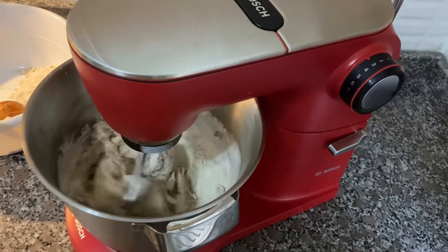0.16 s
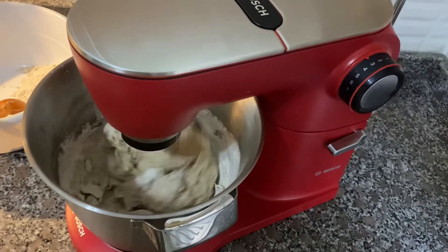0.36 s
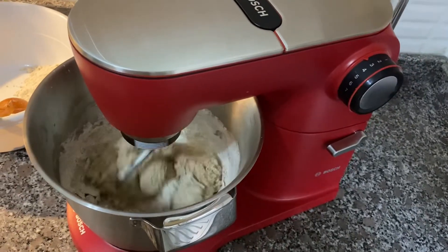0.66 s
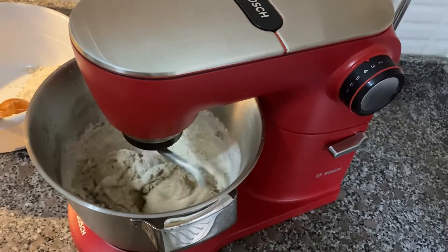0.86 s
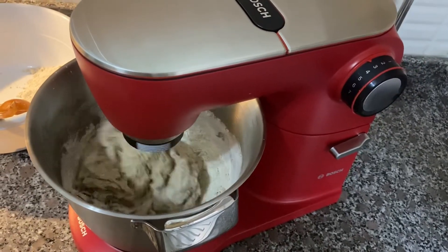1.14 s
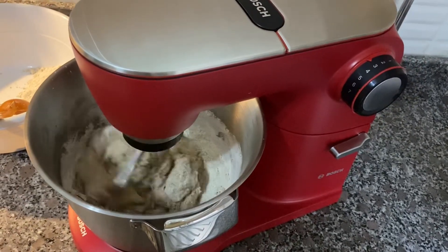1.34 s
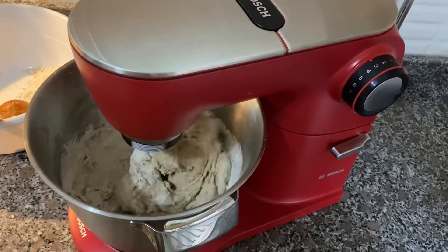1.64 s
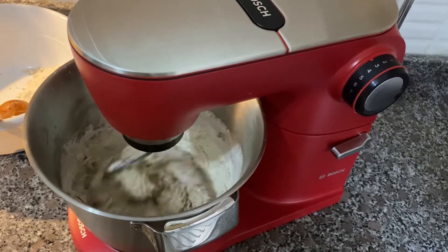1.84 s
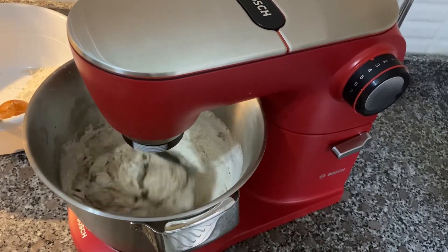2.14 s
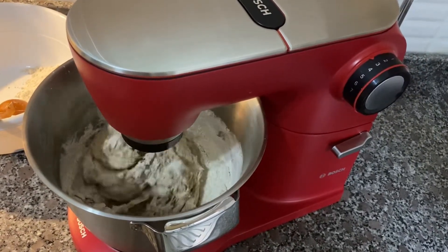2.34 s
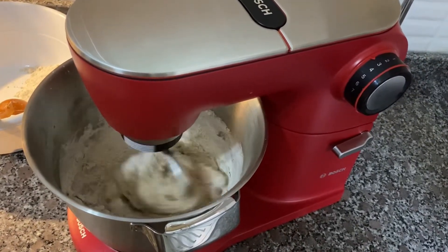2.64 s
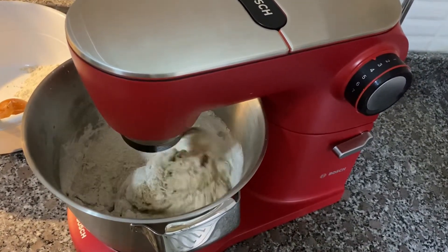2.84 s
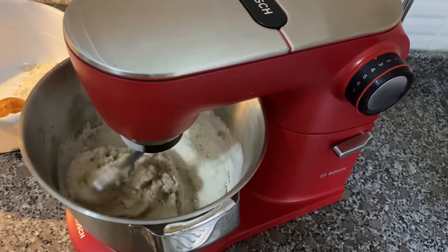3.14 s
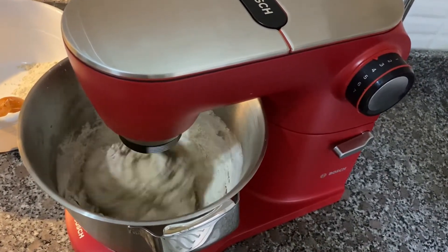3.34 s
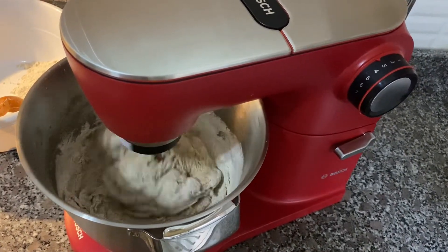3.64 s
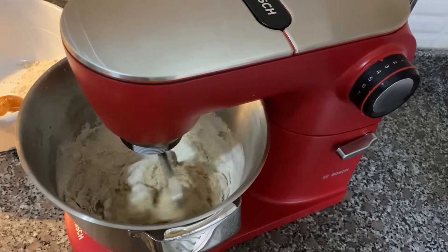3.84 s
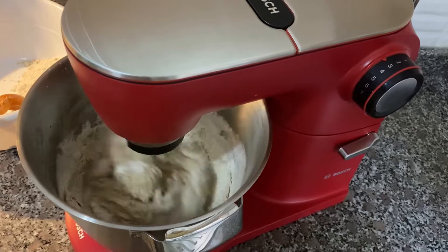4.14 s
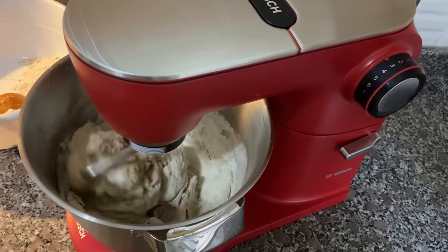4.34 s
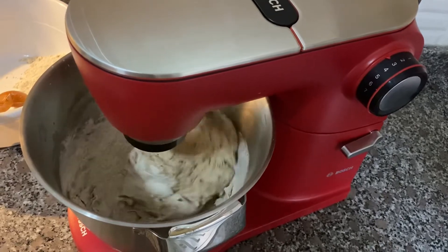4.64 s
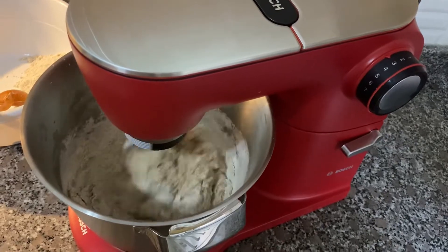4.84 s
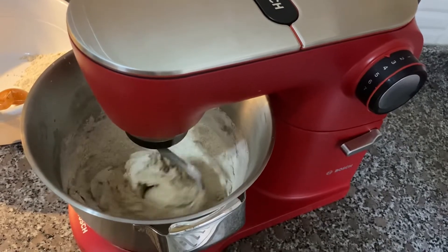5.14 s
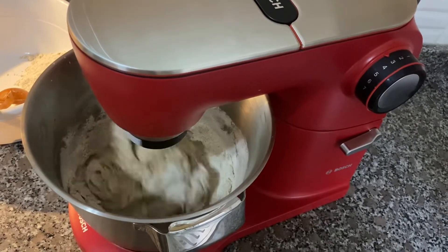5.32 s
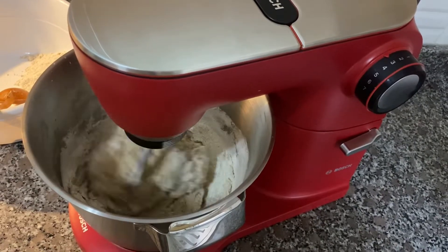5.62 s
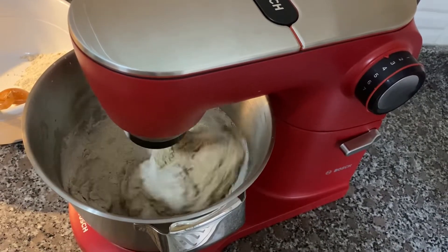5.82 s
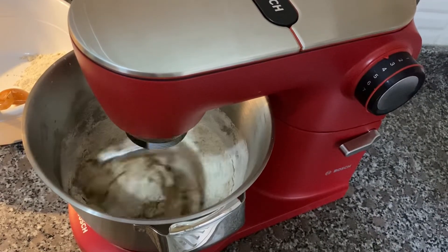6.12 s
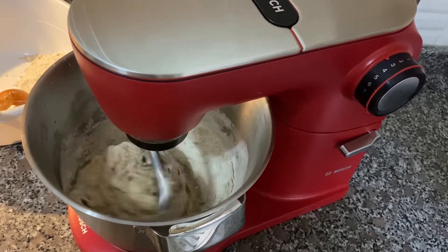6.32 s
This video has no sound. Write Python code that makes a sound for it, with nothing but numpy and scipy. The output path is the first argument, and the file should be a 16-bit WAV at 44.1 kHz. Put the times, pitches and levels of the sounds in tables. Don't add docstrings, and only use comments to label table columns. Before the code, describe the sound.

Close, fairly dry stereo sound of an electric mixer kneading dough, already running and never stopping. The nasal whine wobbles in pitch and loudness with each load, shifting slightly from side to side. A low throbbing hum and grainy housing rattle fill the background, with muffled dough thuds, airy high hiss, a faint thin whistle midway and short metallic clicks from the bowl.

```python
import sys
import numpy as np
from scipy import signal
from scipy.fft import rfft, irfft, next_fast_len
from scipy.io import wavfile
from scipy.ndimage import uniform_filter1d, map_coordinates

SR = 44100
rng = np.random.default_rng(int(sys.argv[2]) if len(sys.argv) > 2 else 0)


def transcribe(u):
    v = np.clip(np.atleast_2d(u).T, -1, 1)
    q = np.round(v * 32767).astype(np.int16)
    wavfile.write(sys.argv[1], SR, q)


def boost(x):
    u = np.asarray(x, float) / 20
    return 10 ** u


N = 285315

TEETH = 23
FREE_HZ = 2020
# centre_hz, width_hz, level_db
HOUSING = [(123, 15, 8), (216.15, 49, 5), (228, 16, 6.5), (308.5, 29.4, 16), (350, 11, 14.5), (414, 86, 9),
           (466, 89, 6.5), (548.5, 16, 11), (648, 59, 8.5), (740, 24, -3), (780, 19, 11.5), (898, 13.6, 14),
           (988, 19, 7), (1030, 21, 13), (1336, 196, 6), (3180, 750, 0.5)]
# centre_hz, width_hz, level_db
HEAD = [(1875, 71, 15.5), (1910, 40, 1), (2076, 37, 7), (3020, 85, 1.5), (3714, 31, 6.5), (3783, 20, 0.5),
        (3963, 93, 3), (5640, 60, -4), (5930, 48, 2.5)]
# middle_s, length_s, sag_hz (tooth rate), lean_db (left-right)
LOADS = [(0.0, 0.24, 112, 3.2), (0.426, 0.24, 111.5, 7), (0.791, 0.32, 136, 1), (1.163, 0.28, 75, -1),
         (1.534, 0.22, 128, 0.4), (1.845, 0.21, 94, 0), (2.07, 0.18, 94.5, 1), (2.379, 0.38, 132.4, -6.5),
         (2.567, 0.18, 19.4, -1.7), (2.739, 0.38, 99.4, 3.5), (3.088, 0.21, 150, -7.5),
         (3.353, 0.29, 114, -4), (3.54, 0.22, 35, -3), (3.903, 0.35, 135.4, -6.5),
         (4.113, 0.16, 62.4, -6.5), (4.263, 0.32, 135, -7), (4.728, 0.41, 94, -1.1),
         (5.07, 0.22, 141, -6.6), (5.37, 0.35, 124.5, -7.5), (5.55, 0.25, 80.6, -4), (5.788, 0.31, 132, -7),
         (6.15, 0.29, 48.8, 2.5), (6.273, 0.39, 108, -6.5)]
# middle_s, length_s, swell_db
SLAPS = [
    (.1, 0.26, 9.5),
    (1.27, .2, 9.5),
    (1.6, .2, 4),
    (2.9, .45, 4),
    (4.0, .15, 5),
    (4.36, .2, 6.5),
    (5.08, .15, 8),
    (5.4, 0.081, 9),
    (6.22, .3, 7),
]


def unit(x):
    return x / np.sqrt(np.mean(x ** 2) + 1e-20)


def along(points, hz):
    f, v = np.transpose(points)
    return np.interp(np.log(hz + 1), np.log(f + 1), v)


def wobble(rate):
    knots = rng.standard_normal(int(N * rate / SR) + 4)
    return map_coordinates(knots, [np.arange(N) * rate / SR])


def swells(rows, column, share=1):
    squareness = 2.5
    rows, t = np.array(rows), np.arange(0, N + 64, 64) / SR
    distance = np.abs(2 * (t[:, None] - rows[:, 0]) / (share * rows[:, 1]))
    bumps = np.exp(-distance ** squareness)
    return np.interp(np.arange(N) / SR, t, bumps @ rows[:, column])


def filtered(x, response):
    m = next_fast_len(N + SR // 4)
    return irfft(rfft(x, m) * response(np.fft.rfftfreq(m, 1 / SR)), m)[..., :N]


def rings(modes):
    return lambda f: np.sqrt(1 + sum(boost(db) ** 2 / (1 + (2 * (f - c) / w) ** 2) for c, w, db in modes))


def patchy(depth_db):
    z = signal.stft(rng.standard_normal((2, N)), nperseg=512)[2]
    field = uniform_filter1d(rng.standard_normal(z.shape[1:]), size=6, axis=0)
    field = uniform_filter1d(field, size=8, axis=1)
    return signal.istft(z * boost(depth_db * unit(field)), nperseg=512)[1][:, :N]


def tone(turns, flutter_db, rate, spread):
    start = rng.uniform(0, 2 * np.pi) + 0.085 * flutter_db * wobble(rate)
    apart = spread * wobble(rate / 4) * np.array([[.5], [-.5]])
    return np.sqrt(2) * boost(flutter_db * wobble(rate)) * np.sin(2 * np.pi * turns + start + apart)


def kitchen(x, wet_db, t60):
    t = np.arange(SR // 5) / SR
    tail = rng.standard_normal((2, len(t))) * boost(-60 * t / t60) * (t > .002)
    echo = signal.fftconvolve(x, tail / np.linalg.norm(tail[0]), axes=1)[:, :N]
    echo = filtered(echo, lambda hz: 1 / (1 + (1200 / (hz + 1)) ** 4))
    return (x + boost(wet_db) * echo) / np.sqrt(1 + boost(wet_db) ** 2)


def ports(x):
    lag = lambda hz: np.pi * np.maximum(hz - 6230, 0) / 5930
    return filtered(x, lambda hz: np.exp(1j * np.outer([1, -1], lag(hz))))


def sag_hz():
    return swells(LOADS, column=2)


def bite_db():
    # middle_s, length_s, swell_db
    bites = [(0, 0.18, 5), (0.417, 0.63, 3.5), (0.774, 0.15, 6), (0.957, 0.099, 2.5), (1.201, 0.29, 4),
             (1.507, 0.09, 3.5), (1.671, 0.32, 2.5), (1.864, 0.097, 3), (2.068, 0.072, 6),
             (2.428, 0.37, 9.5), (2.744, 0.078, 5.5), (3.1, 0.16, 13), (3.335, 0.19, 4.5),
             (3.494, 0.097, 5.6), (3.842, 0.55, 3), (3.868, 0.14, 5), (4.188, 0.28, 11), (4.598, 0.2, 4.5),
             (5.071, 0.14, 8.8), (5.453, 0.43, 10.5), (5.801, 0.14, 6.5), (5.957, 0.09, 5),
             (6.208, 0.18, 11), (6.5, 0.41, 5.5)]
    return swells(bites, column=2)


def whine_lean_db():
    return 1.8 + 1.2 * swells(LOADS, column=3, share=.9)


def orbit(lag_s):
    round_s, first_drop_s = 1.045, 0.076
    return np.cos(2 * np.pi * (np.arange(N) / SR - first_drop_s - lag_s) / round_s)


def shaft_turns():
    tooth_hz = FREE_HZ - sag_hz()
    turns = np.cumsum(tooth_hz * (1 + 0.0014 * wobble(25))) / SR / TEETH
    rock = 2 * np.pi * turns * .235 + 0.65 * wobble(3.06)
    return turns + 0.73 / (2 * np.pi * TEETH) * np.sin(rock), rock


def tooth_mesh(turns, rock):
    level_db = -38 + 1.093 * bite_db() + 0.56 * wobble(14)
    pan_db = whine_lean_db() + 2.7 * wobble(15)
    loose = np.clip((-24.5 - level_db) / 10, .4, 1)
    beads = 0.53 * np.cos(rock) - 0.32 * np.cos(2 * rock + 1.5) + 0.34 * wobble(110)
    teeth = turns * TEETH + 0.086 * loose * wobble(70)
    contact = tone(teeth, flutter_db=1.8, rate=60, spread=0.29 + 1.36 * loose)
    mesh = unit((1 - loose * beads) * contact)
    return boost(level_db - 3.5 + np.outer([.5, -.5], pan_db)) * mesh


def tooth_sidebands(turns):
    sidebands = [(-1, -67), (1, -52), (2, -60)]
    damping_db = 3.5 * sag_hz() / 100
    return sum(boost(db - damping_db) * tone(turns * (TEETH + k), flutter_db=3.5, rate=30, spread=2.8)
               for k, db in sidebands)


def tooth_overtones(turns):
    # multiple (of the tooth rate), level_db
    overtones = [(2, -4.5), (2.04, -16.5), (3.001, -16.5)]
    # middle_s, length_s, swell_db
    flares = [(.1, .4, 3), (1.1, 0.22, 7), (1.36, .15, 5), (1.49, .08, 9), (1.85, .4, 4.5), (2.33, .2, 6),
              (2.66, .15, 8), (3.08, .2, 6), (3.6, .3, 3), (3.88, .15, 6), (4.2, 0.33, 7), (4.58, .3, 6.5),
              (4.97, .15, 7), (5.42, .3, 6.5), (5.78, .15, 4), (6.22, .2, 9), (6.47, .1, 6)]
    flare_db = -53 + swells(flares, column=2) + .8 * wobble(11) + 2.4 * wobble(90)
    return sum(boost(db + flare_db)
               * tone((turns * TEETH + .05 * wobble(60)) * k, flutter_db=2.0, rate=40, spread=0.58)
               for k, db in overtones)


def whine(turns, rock):
    ringing = filtered(tooth_sidebands(turns) + tooth_overtones(turns), rings(HEAD))
    return tooth_mesh(turns, rock) + kitchen(ringing, wet_db=-3.5, t60=0.38)


def shaft_thump(turns):
    # middle_s, length_s, swell_db
    shakes = [(0.185, 0.51, 7.5), (0.502, 0.15, 5.3), (0.821, 0.074, 14.5), (1.025, 0.24, 9),
              (1.339, 0.22, 7.3), (1.737, 0.33, 8.2), (2.003, 0.12, 11.3), (2.131, 0.083, 7.6),
              (2.333, 0.07, 4.3), (2.744, 0.51, 11), (3.079, 0.07, 7.5), (3.387, 0.1, 11),
              (3.586, 0.17, 6.5), (3.838, 0.12, 7), (4.048, 0.26, 9.5), (4.452, 0.45, 7), (4.674, 0.19, 6),
              (4.905, 0.15, 8.5), (5.078, 0.083, 4.3), (5.258, 0.08, 6.3), (5.584, 0.6, 11),
              (6.33, 0.56, 9.5)]
    level_db = -46 + 1.08 * swells(shakes, column=2) + 0.8 * wobble(11) + 1.3 * wobble(24)
    return boost(level_db) * tone(turns, flutter_db=0.0, rate=6.5, spread=0.21)


def gear_orders(turns):
    orders = [(1.5, -54), (2, -55.5), (2.5, -53.5), (3, -55.5), (5, -52.5), (5.5, -55.5), (6.5, -50),
              (8, -46.5), (9, -54.5), (9.75, -53), (11, -54), (13, -53.5), (38, -58.5)]
    return sum(boost(db) * tone(turns * k, flutter_db=4.0, rate=2.6 * k + 8, spread=0.13 * k) for k, db in orders)


def mains_hum(turns):
    # pitch_hz, level_db (rms)
    multiples = [(100, -46.5), (200, -72), (400, -51.5)]
    # pitch_hz, added_orders (shaft), level_db (rms)
    beats = [(200.7, 1, -48), (400, -1, -46.5), (505.4, -2, -50.5)]
    t = np.arange(N) / SR
    hum = sum(boost(db) * tone(t * hz, flutter_db=4.0, rate=13, spread=0.55) for hz, db in multiples)
    buzz_db = -39 + 0.082 * bite_db() + 0.23 * swells(SLAPS, column=2)
    buzz_db = buzz_db + 1.16 * wobble(9) + 1.9 * wobble(22)
    buzz = boost(buzz_db) * tone(t * 300, flutter_db=-0.1, rate=14, spread=0.58)
    beating = sum(boost(db) * tone(t * hz + k * turns, flutter_db=3, rate=9, spread=0.9) for hz, k, db in beats)
    return hum + buzz + beating


def rattle(turns):
    # pitch_hz, level_db (per Hz)
    colour = [(15, -60), (30, -43), (80, -5.5), (110, -21), (260, -21.5), (500, -19.5), (1100, -19.5),
              (1200, -22.5), (1900, -18), (2480, -20), (4200, -25), (4600, -27), (7000, -32), (9000, -120)]
    # pitch_hz, likeness (correlation, 1 = equal)
    alike = [(60, .98), (125, 0.9), (300, 1), (650, 0.48), (1100, 0.033), (2200, 0.25), (3500, 0.48),
             (5000, 0.39), (6000, 0.58), (6300, 0.3), (6850, 0.17), (7050, 0.28)]
    mains = np.sin(2 * np.pi * 200 * np.arange(N) / SR)
    pulse = boost(0.32 * mains + 0.17 * np.sin(2 * np.pi * turns) + 0.48 * wobble(14))
    angle = lambda hz: np.arccos(np.clip(along(alike, hz), -1, 1)) / 2
    body = lambda hz: boost(along(colour, hz)) * rings(HOUSING)(hz) * np.sqrt(rings(HEAD)(hz))
    split = lambda hz: body(hz) * np.array([np.cos(angle(hz)), np.sin(angle(hz))])
    mid, side = filtered(pulse * patchy(depth_db=0.92), split)
    level_db = -40 + 0.032 * bite_db() + 0.38 * wobble(5) + 5.5
    return kitchen(boost(level_db) * unit(np.array([mid + side, mid - side])), wet_db=-8, t60=0.068)


def heave():
    boom_db = -55 + 4 * orbit(lag_s=.03) + 1.5 * wobble(4.7)
    thud_db = -46 + swells(SLAPS, column=2) + 1.2 * wobble(6)
    boom = filtered(rng.standard_normal(N), lambda hz: 1 / (1 + ((hz - 47) / 10) ** 4))
    bowl = lambda hz: rings(HOUSING)(hz) / (1 + ((hz - 175) / 60) ** 4)
    a, b = filtered(rng.standard_normal((2, N)), bowl)
    thud = unit(np.array([a + .25 * b, a - 0.28 * b]))
    return boost(boom_db) * unit(boom) + boost(thud_db - 5) * thud


def brushes():
    # pitch_hz, level_db (per Hz)
    hiss = [(5000, -120), (6000, -41), (7000, 3.5), (7700, 4), (9000, -3.5), (11000, 1), (12300, -3.5),
            (13500, 2), (14400, -7), (15700, -4.5), (16000, -120)]
    a, b = patchy(depth_db=-0.1) * boost(0.57 * wobble(300) + .6 * wobble(9))
    pair = np.array([a + 0.34 * b, a - 0.19 * b])
    colour = lambda hz: boost(along(hiss, hz)) * (1 + 1.1 / (1 + ((hz - 12250) / 60) ** 2))
    level_db = -56 - 0.74 * sag_hz() / 100 + 0.47 * wobble(5.2) + 2.5
    return boost(level_db) * unit(filtered(pair, colour))


def coil_whistle():
    start_s, rise_s, hold_s, fall_s = .8, 1.5, .42, .08
    corners_s = np.cumsum([start_s, rise_s, hold_s, fall_s])
    swell = np.interp(np.arange(N) / SR, corners_s, [0, 1, 1, 0])
    pitch_hz = 5920 + 60 * swell + 8 * wobble(15)
    return boost(-74 + 13.5 * swell) * tone(np.cumsum(pitch_hz) / SR, flutter_db=4.0, rate=50, spread=0.66)


def bright_puffs():
    # start_s, level_db (peak)
    spits = [(1.1253, -48), (1.2475, -41), (3.1901, -42), (3.9419, -47), (4.164, -47), (4.8986, -41),
             (5.3797, -47), (5.757, -41), (5.8096, -47), (5.9284, -42), (6.3579, -47), (6.4178, -40)]
    out, t = np.zeros(N + SR), np.arange(SR // 20) / SR
    for s, db in spits:
        out[round(s * SR):][:len(t)] += boost(db + 1.5 - 60 * t / .05) * rng.standard_normal(len(t))
    return filtered(np.array([out[:N], out[:N]]), lambda hz: 1 / (1 + (7500 / (hz + 1)) ** 6))


def ticks():
    # start_s, level_db (peak), pitch_hz
    touches = [
        (1.248, -43, 7400),
        (2.281, -35, 3698),
        (3.098, -41, 6800),
        (4.164, -39, 6830),
        (4.899, -54, 11990),
        (4.985, -38, 4307),
        (5.38, -54, 6496),
        (5.982, -37, 4610),
    ]
    out, t = np.zeros((2, N + SR)), np.arange(SR // 40) / SR
    for s, db, hz in touches:
        drift = 2.1 * np.cumsum(rng.standard_normal(len(t))) / 8
        envelope = boost(-60 * t / 0.0083) * (1 - np.exp(-t / .0003))
        ring = envelope * np.sin(2 * np.pi * hz * t + drift)
        for lag_s, weaker_db in [(0, 0.5), (.003, 5)]:
            out[:, round((s + lag_s) * SR):][:, :len(t)] += boost(db + 11 - weaker_db) * ring
    return out[:, :N]


def scene():
    # pitch_hz, lean_db (left-right)
    lean = [(60, -2), (370, -3.5), (1200, -3.5), (4200, -5), (7000, 0.5)]
    turns, rock = shaft_turns()
    low = shaft_thump(turns) + gear_orders(turns) + mains_hum(turns) + coil_whistle()
    body = low + rattle(turns) + heave()
    body = filtered(body, lambda hz: boost(np.outer([.5, -.5], along(lean, hz))))
    return body + whine(turns, rock) + ports(brushes() + bright_puffs() + ticks())


def roll_off(x):
    return signal.sosfilt(signal.butter(12, 15750, fs=SR, output="sos"), x)


def record(dry):
    return roll_off(dry)


dry = scene()
out = record(dry)
transcribe(out)
```